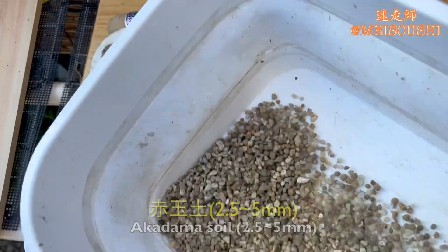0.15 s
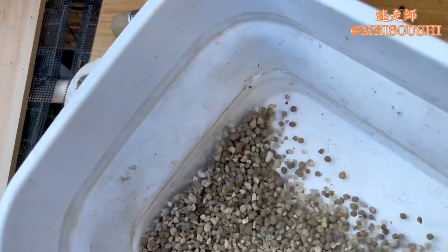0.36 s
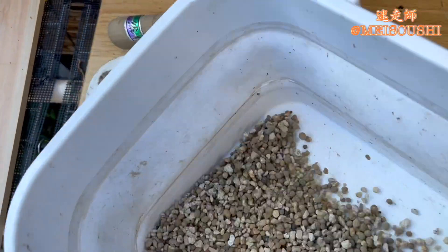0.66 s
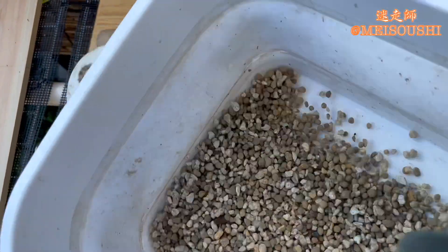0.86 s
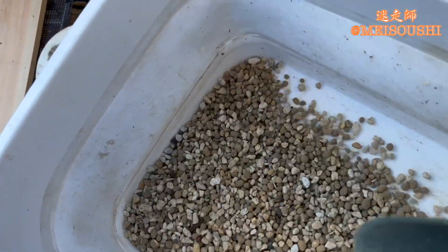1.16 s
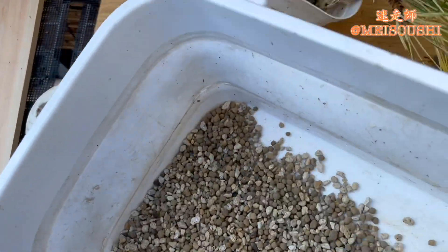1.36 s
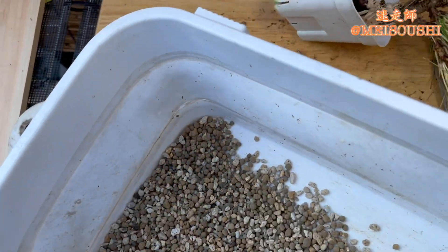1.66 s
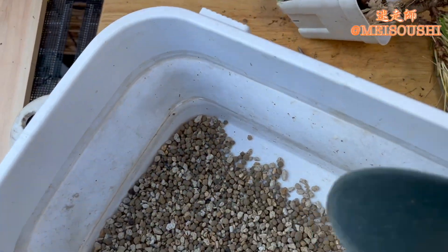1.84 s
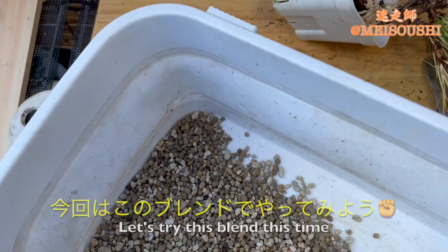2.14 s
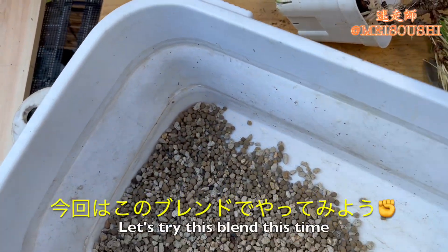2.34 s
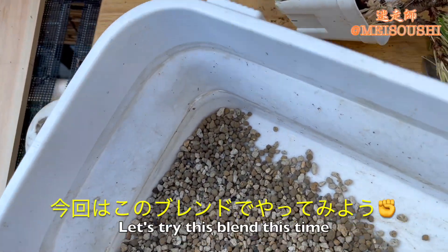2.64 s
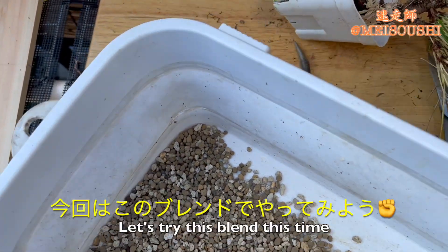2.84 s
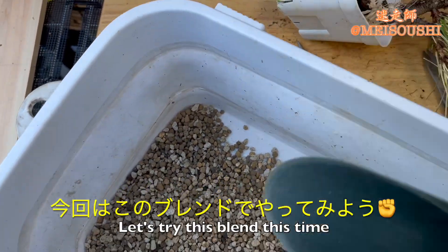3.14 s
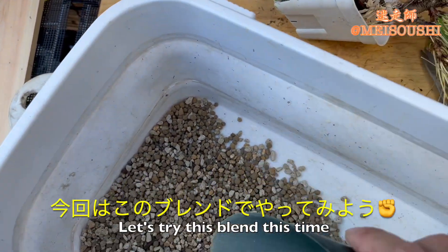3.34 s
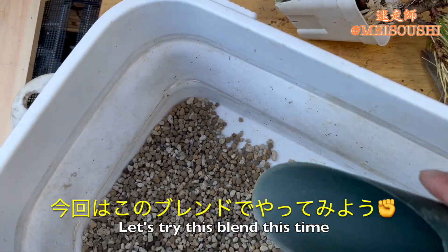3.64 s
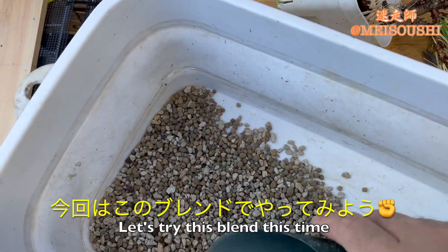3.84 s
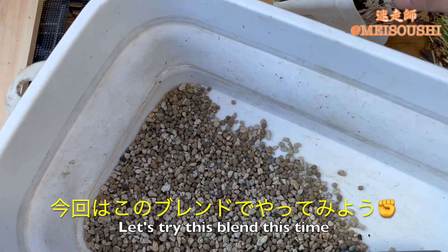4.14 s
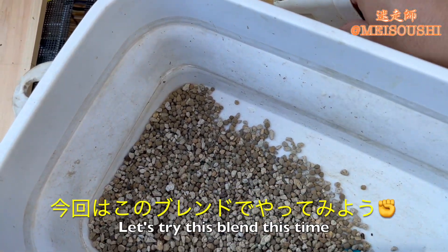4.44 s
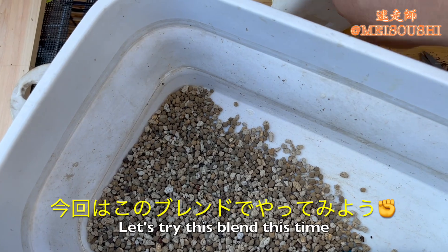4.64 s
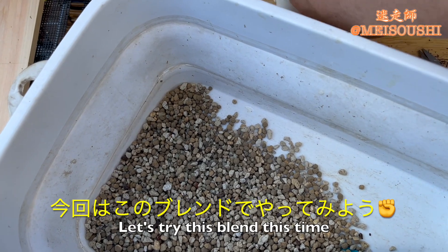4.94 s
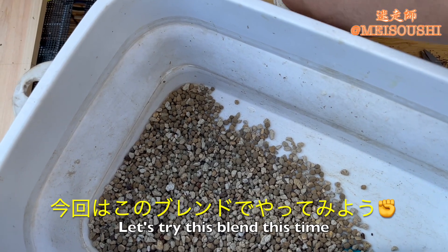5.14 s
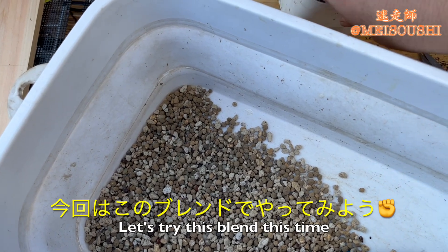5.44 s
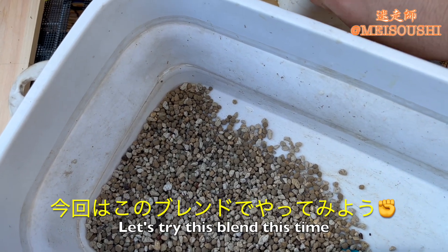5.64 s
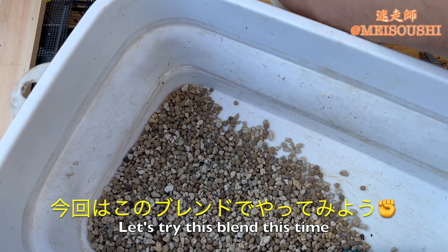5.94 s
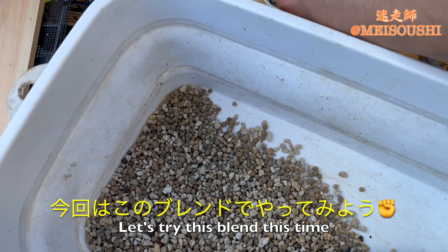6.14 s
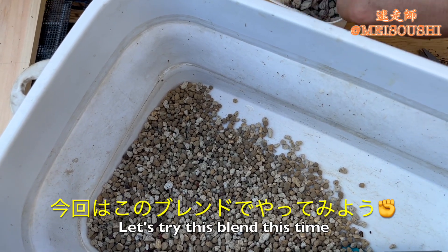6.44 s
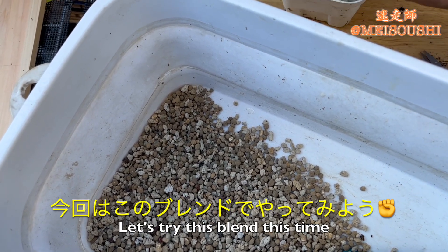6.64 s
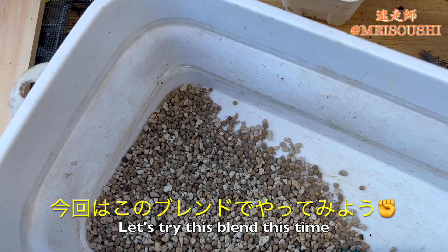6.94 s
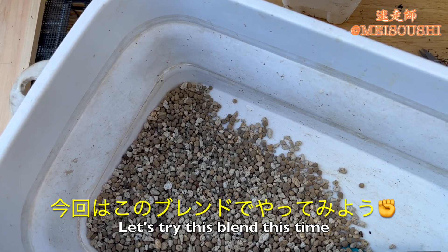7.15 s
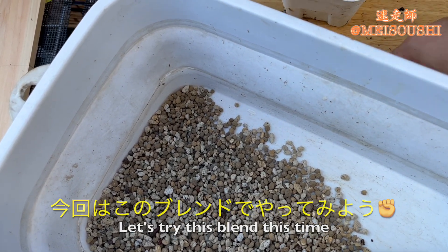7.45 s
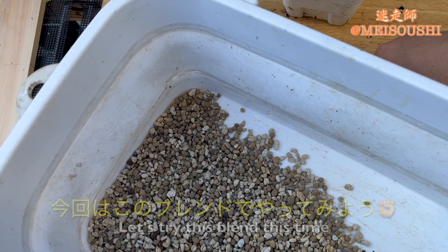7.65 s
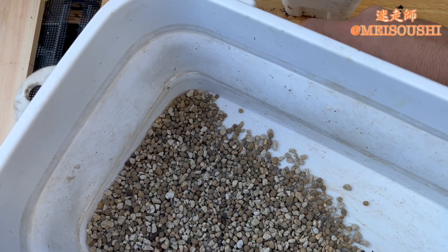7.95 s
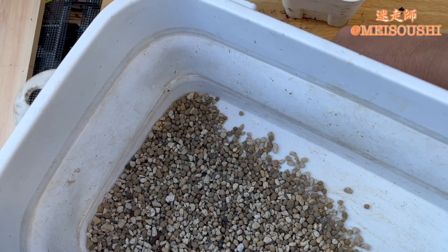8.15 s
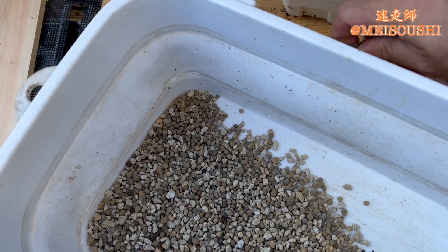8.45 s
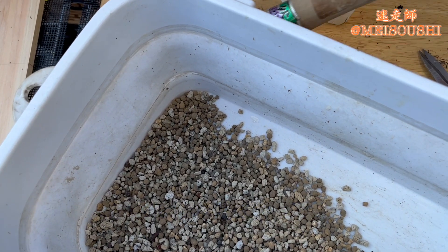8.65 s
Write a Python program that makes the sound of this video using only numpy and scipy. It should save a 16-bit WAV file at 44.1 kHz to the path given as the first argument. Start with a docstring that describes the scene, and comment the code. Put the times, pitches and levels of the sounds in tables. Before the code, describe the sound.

A second of hissing, drumming soil grains into a hollow tub, a few scoop raps, then scattered wooden knocks, scrapes and thin birdsong.

```python
"""Potting bench with birds

Hard soil granules pour from a scoop into a plastic tub as filtered random collisions in waves, and the scoop
is rapped on the tub, ringing its modes. Tools, pots and tub then knock and bump at a wooden bench as dying
vibrations and gritty bursts, with stray ticks, a squeak, sliding and rustling soil. Outdoors, small birds keep up
thin, mostly rising calls, made of gliding sines with echoes, over open air and a low rumble of filtered noise."""
import sys
import numpy as np
from scipy import signal
from scipy.fft import rfft, irfft, next_fast_len
from scipy.io import wavfile
from scipy.ndimage import map_coordinates

SR = 44100
rng = np.random.default_rng(int(sys.argv[2]) if len(sys.argv) > 2 else 0)


def log_audio(samples):
    """Write samples as a 16-bit WAV file to the path given in sys.argv[1]."""
    # one column per channel
    frames = np.atleast_2d(samples).T
    # limit to full scale, then quantise
    limited = np.clip(frames, -1, 1)
    pcm = np.round(limited * 32767).astype(np.int16)
    wavfile.write(sys.argv[1], SR, pcm)


N = 387638

# Hiss of fine granules. Each row: frequency in Hz, relative density in dB per Hz.
GRANULE_HISS = [(1500, 1), (4000, 3), (7500, -0.5), (10000, -3), (12000, -9), (16000, -9)]
# Mid-range clack of plastic. Each row: frequency in Hz, relative density in dB per Hz.
PLASTIC_CLACK = [(300, -24), (700, 6.5), (1300, 19.5), (2000, 10.5), (3600, 3), (5500, -43), (12000, -86)]
# Sharper snap of a small contact. Each row: frequency in Hz, relative density in dB per Hz.
CONTACT_SNAP = [(900, -15.5), (1900, -3.5), (3300, -2.5), (4800, -22.5), (9000, -24.5)]


def amp(db):
    """Decibels to gain."""
    return 10 ** (np.asarray(db) / 20)


def unit(x):
    """Scale to rms 1."""
    return x / np.sqrt(np.mean(x ** 2) + 1e-20)


def crest(x):
    """Scale to peak 1."""
    return x / (np.abs(x).max() + 1e-20)


def along(points, hz):
    """Interpolate (Hz, value) points on a log frequency axis."""
    f, v = np.transpose(points)
    return np.interp(np.log(hz + 1), np.log(f + 1), v)


def curves(rows):
    """One value per sample for each column after the time."""
    s, *cols = np.transpose(rows)
    return [np.interp(np.arange(N) / SR, s, c) for c in cols]


def wobble(rate, size=N):
    """A smooth random curve, rate knots a second."""
    knots = rng.standard_normal(int(size * rate / SR) + 4)
    return map_coordinates(knots, [np.arange(size) * rate / SR])


def coloured(x, gain_db):
    """x through a causal, minimum-phase filter whose dB gain is a function of frequency."""
    size = x.shape[-1]
    m = 2 * next_fast_len(size // 2 + 2048)
    cep = irfft(np.log(amp(gain_db(np.fft.rfftfreq(m, 1 / SR))) + 1e-6))
    # folding the cepstrum forward in time makes the filter causal
    cep[1:m // 2] *= 2
    cep[m // 2 + 1:] = 0
    return irfft(rfft(x, m) * np.exp(rfft(cep)), m)[..., :size]


def shaped(x, spectrum):
    """x filtered by a spectrum of (Hz, dB) points."""
    return coloured(x, lambda hz: along(spectrum, hz))


def spread(pair, side_db):
    """Left and right from a common and a differing signal."""
    return pair[0] + amp(side_db) * np.array([pair[1], -pair[1]])


def panned(x, pan_db):
    """x with its left side raised by pan_db relative to its right."""
    return x * amp([[pan_db / 2], [-pan_db / 2]])


def add(track, s, sound):
    """Mix a sound into a track at time s."""
    start = max(0, round(s * SR))
    part = track[..., start:start + sound.shape[-1]]
    part += sound[..., :part.shape[-1]]


def swells(rows, attack_s, release_s, rest_db):
    """Gain of (s, length, dB) gestures that rise, hold and die away over a resting level."""
    t = np.arange(N) / SR
    power = amp(rest_db) ** 2
    for s, length, db in rows:
        rise = np.clip((t - s) / attack_s, 0, 1)
        fall = np.exp(-np.clip((t - s - length) / release_s, 0, 20))
        power = power + (amp(db) * rise * fall) ** 2
    return np.sqrt(power)


def grains(rate, size_db, side_db):
    """Random collisions, rate a second, of varied size, each from its own direction."""
    hit = rng.random(N) < rate / SR
    size = amp(size_db * np.minimum(rng.exponential(size=N), 4))
    return spread(hit * size * rng.standard_normal((2, N)), side_db)


def burst(t, spectrum, t60):
    """A short gritty crackle; rough surfaces take a moment to meet."""
    decay = amp(-60 * t / max(t60, .001))
    noise = rng.standard_normal((2, len(t))) * decay * (1 - np.exp(-t / 0.00011))
    grit = amp(2.9 * wobble(350, size=SR // 3)[:len(t)])
    return spread(crest(shaped(noise * grit, spectrum)), side_db=4.5)


def mode(t, hz, t60):
    """One vibration that decays by 60 dB in t60 seconds."""
    return np.sin(2 * np.pi * hz * t) * amp(-60 * t / max(t60, .002))


def yard(x):
    """Walls and foliage scatter the sound back, differently to each side."""
    # Decay of the scattered sound. Each row: frequency in Hz, t60 in seconds.
    yard_decay = [(100, 0.16), (1000, 0.042), (4000, 0.13), (12000, 0.072)]
    hz, t, z = signal.stft(rng.standard_normal((2, SR // 2)), SR, nperseg=256)
    decay = amp(-60 * t / along(yard_decay, hz)[:, None])
    tail = signal.istft(z * decay, SR, nperseg=256)[1]
    return signal.fftconvolve(np.atleast_2d(x), tail / np.linalg.norm(tail[0]), axes=1)[:, :N]


def grove(x):
    """Leaves and branches smear a call into a soft tail, different on each side."""
    t60_s = .28
    t = np.arange(SR // 2) / SR
    tail = rng.standard_normal((2, len(t))) * amp(-60 * t / t60_s)
    return signal.fftconvolve(x[None], tail / np.linalg.norm(tail[0]), axes=1)[:, :N]


def echoes(x, count=7):
    """Nearby walls return a few distinct copies, and the trees a diffuse tail."""
    out = np.zeros((2, N))
    for side in out:
        for delay, strength in rng.random((count, 2)):
            add(side, .003 + .04 * delay, (.08 + .16 * strength) * x)
    return out + amp(-2.5) * grove(x)


def pour():
    """Shaken waves of granules and lumps drum on the tub's floor and hiss on each other, then settle."""
    # Waves thrown by shakes of the scoop. Each row: crest in seconds, relative hiss and rattle levels in dB.
    shakes = [(0.0, -27.5, -34), (0.104, -22.5, -27.5), (0.251, -26.5, -31.5), (0.38, -24, -28.5),
              (0.526, -25.5, -29.5), (.59, -44, -36), (0.677, -21.5, -27), (.79, -31, -32), (.94, -33, -38)]
    # Drumming on the tub. Each row: frequency in Hz, relative density in dB per Hz.
    rattle_spectrum = [(60, -49), (150, -17), (300, -2.5), (500, 0.5), (700, -1.5), (1200, 0), (2200, -7),
                       (3500, -12), (5200, -11), (7000, -37), (10000, -45)]
    # The tub's resonances under the stream. Each row: frequency in Hz, width in Hz, boost in dB.
    hollow = [(480, 150, 7), (805, 70, 6.5), (1005, 48, 7), (1296, 29, 5.5), (1827, 81, 5.5),
              (3620, 100, 7)]
    steady_hiss_db, steady_rattle_db = -34, -36.5  # the stream between shakes
    rise_s, fall_s = 0.037, 0.05  # a wave builds quickly and thins out more slowly
    empty_s = .97  # when the scoop runs empty
    rattle_settle, hiss_settle = 120, 230  # dB per second
    t = np.arange(N) / SR
    hiss_power, rattle_power = amp(steady_hiss_db) ** 2, amp(steady_rattle_db) ** 2
    for s, hiss_db, rattle_db in shakes:
        distance = np.maximum((s - t) / rise_s, (t - s) / fall_s)
        wave = np.exp(-np.minimum(distance ** 2, 20))
        hiss_power = hiss_power + amp(hiss_db) ** 2 * wave
        rattle_power = rattle_power + amp(rattle_db) ** 2 * wave

    def tub_db(hz):
        """The drumming spectrum with the tub's resonant peaks on top."""
        peaks = sum(db / (1 + (2 * (hz - c) / w) ** 2) for c, w, db in hollow)
        return along(rattle_spectrum, hz) + peaks

    fine = grains(rate=3400, size_db=-1.7, side_db=-27.0)
    lumps = np.tanh(grains(rate=160, size_db=7.0, side_db=2.5))
    rattle = unit(unit(coloured(fine, tub_db)) + amp(-5) * unit(coloured(lumps, tub_db)))
    hiss = unit(shaped(grains(rate=6000, size_db=0.3, side_db=6.0), GRANULE_HISS))
    settling = np.maximum(t - empty_s, 0)
    rattle_gain = np.sqrt(rattle_power) * amp(-rattle_settle * settling)
    hiss_gain = np.sqrt(hiss_power) * amp(-1.0 - hiss_settle * settling)
    return rattle_gain * rattle + hiss_gain * hiss


def stirred_soil():
    """Granules rub and crunch unevenly with each stroke and with a trickle; a few jump off and tick."""
    # Strokes through loose soil. Each row: start in seconds, length in seconds, relative crunch and hiss in dB.
    stirs = [(1.014, 0.087, -42.5, -60), (1.502, .29, -62, -61.5), (2.037, 0.12, -55, -70),
             (2.753, 0.5, -58, -70), (3.673, 0.14, -48, -61.5), (3.84, 0.2, -47.5, -62),
             (4.47, 0.33, -64.5, -81), (4.733, 0.13, -57, -73), (5.06, .12, -56.5, -72),
             (5.197, 0.26, -63, -91), (6.135, 0.42, -56, -79)]
    # A slow trickle of soil beside the tub. Each row: time in seconds, relative flow in dB.
    trickle = [(5.45, -86), (5.9, -65.5), (6.3, -58.5), (7.05, -58), (7.55, -66), (8.2, -75)]
    # Coarse soil rubbing. Each row: frequency in Hz, relative density in dB per Hz.
    crunch_spectrum = [(200, -17), (500, 6.5), (1350, 11), (2200, 2), (4500, -2.5), (7000, -7.5),
                       (12000, -51)]
    attack_s, release_s = 0.012, 0.084
    crunch_rest_db, hiss_rest_db = -69, -72  # soil creeping between strokes
    trickle_crunch_db, fill_db_per_s = 5, 7  # crunch at first, and how fast the growing heap muffles it
    strokes = np.array(stirs)
    flow_db, = curves(trickle)
    filling_s = np.maximum(np.arange(N) / SR - trickle[0][0], 0)
    trickle_crunch = amp(flow_db + trickle_crunch_db - fill_db_per_s * filling_s)
    stroke_crunch = swells(strokes[:, [0, 1, 2]], attack_s, release_s, crunch_rest_db)
    crunch_gain = np.hypot(stroke_crunch, trickle_crunch)
    stroke_hiss = swells(strokes[:, [0, 1, 3]], attack_s, release_s, hiss_rest_db)
    hiss_gain = np.hypot(stroke_hiss, amp(flow_db))
    crunch = unit(shaped(grains(rate=1100, size_db=2.2, side_db=-3), crunch_spectrum))
    crunch = unit(crunch + yard(crunch[0]))
    hiss = unit(shaped(grains(rate=4000, size_db=2.5, side_db=0), GRANULE_HISS))
    # loose granules that jump off moving soil
    strays = unit(shaped(grains(rate=19, size_db=-7.0, side_db=30.0), GRANULE_HISS))
    unevenness = amp(3.5 * wobble(40) + 2 * wobble(9))
    fine = np.sqrt(unevenness) * hiss + amp(-1.5) * strays
    return crunch_gain * unevenness * crunch + amp(7) * hiss_gain * fine


def shifting():
    """Things dragged over the bench rumble and scrape, over a low distant rumble; both are random noise."""
    # Drags. Each row: start in seconds, length in seconds, relative rumble and scrape levels in dB.
    drag_rows = [(1.358, 0.32, -42, -62), (2.091, 0.082, -33.5, -44), (2.208, 0.12, -28.5, -43),
                 (2.758, 0.37, -36.5, -56), (3.1, 0.19, -45, -52.5), (3.656, 0.45, -49, -53),
                 (6.592, 0.08, -33, -72), (6.763, 0.408, -35.5, -78), (7.56, 0.099, -48.5, -49),
                 (8.051, 0.25, -56, -48), (8.54, 0.19, -42.5, -76)]
    # Low background rumble. Each row: time in seconds, relative level in dB.
    distant = [(0, -47.5), (1.2, -46), (1.9, -47.5), (3.2, -44.5), (4.25, -59.5), (5.0, -49), (5.8, -51.5),
               (6.45, -41), (7.4, -59.5), (8.79, -56.5)]
    # Low rumble. Each row: frequency in Hz, relative density in dB per Hz.
    rumble_spectrum = [(20, -56), (31, 0.5), (45, -4.5), (65, 2), (100, -5), (170, -14.5), (300, -23),
                       (900, -74.5)]
    # Scraping. Each row: frequency in Hz, relative density in dB per Hz.
    scrape_spectrum = [(60, -39), (150, 12.5), (300, 8), (500, 1.5), (750, -22), (1500, -20.5), (4000, -65)]
    attack_s, release_s = 0.021, 0.022
    drags = np.array(drag_rows)
    distant_db, = curves(distant)
    drag_gain = swells(drags[:, [0, 1, 2]], attack_s, release_s, rest_db=-64)
    rumble_gain = np.hypot(drag_gain, amp(distant_db + 2.0))
    scrape_gain = swells(drags[:, [0, 1, 3]], attack_s, release_s, rest_db=-61.5)
    rumble = unit(shaped(spread(rng.standard_normal((2, N)), side_db=-3.5), rumble_spectrum))
    scrape = unit(shaped(grains(rate=650, size_db=2.0, side_db=-0.5), scrape_spectrum))
    return rumble_gain * rumble + amp(3.5) * scrape_gain * panned(scrape, pan_db=-11.0)


def open_air():
    """The steady outdoor background is wide, filtered noise."""
    # Outdoor background. Each row: frequency in Hz, relative density in dB per Hz.
    air_spectrum = [(28, -25), (60, -10), (170, -1.5), (350, -19), (800, -17), (2200, -31.5), (4500, -33),
                    (8000, -34.5), (16000, -51.5)]
    noise = spread(rng.standard_normal((2, N)), side_db=4.5)
    return amp(-51.0) * unit(shaped(noise, air_spectrum))


def whistle(length, start_hz, end_hz, bow):
    """A raspy whistle bends between two pitches over a low second voice, then glides fast to a last pitch."""
    close_hz, close_s = 2972, .028  # where the closing glide aims, and its duration
    under_hz, under_follows = 2710, 0.19  # second voice: resting pitch, share by which it follows the first
    length = np.clip(length, .02, .2)
    t = np.arange(int((length + close_s) * SR)) / SR
    u, after = np.minimum(t / length, 1), np.maximum(t - length, 0)
    waver, rasp, flutter = [wobble(rate, size=SR // 4)[:len(t)] for rate in (600, 700, 80)]
    middle_hz = (start_hz + end_hz) / 2 * (1 + bow)
    arch = np.polyval(np.polyfit([0, .5, 1], [start_hz, middle_hz, end_hz], 2), u)
    hz = arch * (close_hz / end_hz) ** (after / close_s) * (1 + .013 * waver)
    second_hz = under_hz * (hz / under_hz) ** under_follows
    phase, under = 2 * np.pi * np.cumsum([hz, second_hz], axis=1) / SR
    # low calls are richer in their octave
    octave = amp(np.interp(middle_hz, [3650, 4250], [-11, -22])) * np.sin(2 * phase)
    voice = np.sin(phase) + octave + amp(-14.5) * np.sin(under)
    swell = np.interp(t / length, [0, .1, .6, 1, t[-1] / length], [0, .6, 1.1, .45, .1])
    rough = unit(voice * amp(3 * rasp + 3.5 * flutter))
    return swell * signal.windows.tukey(len(t), .1) * rough


def flock(count=800):
    """Faint overlapping notes from further off come in bouts and blur into a chatter."""
    # Bouts of twitter. Each row: start in seconds, length in seconds, level in dB.
    bouts = [(1.28, .8, -58), (5.05, 0.2, -56.5), (5.55, 0.25, -60), (6.08, 0.41, -56.5), (6.5, 0.34, -58),
             (7.35, 1.16, -55.5)]
    notes = []
    for pitch, slope in rng.random((90, 2)):
        start_hz = 2900 + 2400 * pitch
        notes.append(whistle(.05, start_hz, start_hz * (.88 + .3 * slope), bow=.02))
    out = np.zeros(N)
    for when, which in rng.random((count, 2)):
        add(out, when * N / SR, notes[int(which * len(notes))])
    gain = swells(bouts, attack_s=0.0077, release_s=0.047, rest_db=-68)
    return gain * unit(grove(out) + out / 2)


def raps():
    """Each rap of the scoop rings the tub; a harder contact wakes its higher modes."""
    # Modes of the plastic floor. Each row: frequency in Hz, relative level in dB, t60 in seconds at full ring.
    tub_modes = [(172.5, -14.5, 0.28), (281, 4, 0.033), (341, 0.5, 0.052), (489.9, -1.5, 0.16),
                 (497, -1.5, 0.14), (741, -4, 0.06), (842, -6.5, 0.074), (1302, -17, 0.16),
                 (1570, -14.5, 0.071), (2650, -19, 0.033), (3720, -16.5, 0.033)]
    # Raps. Each row: time in seconds, relative level in dB, hardness in dB per octave, share of the full ring.
    rap_rows = [(.337, -17.5, -0.5, 0.24), (.596, -19, 1, 0.29), (0.72, -20, -9, 0.3),
                (.764, -9, -3.5, 0.98), (0.982, -7.5, 1, 1.07), (1.064, -10.5, -2.5, 0.75),
                (1.111, -18.5, -3, 1.3), (1.117, -25.5, 2.5, 1.2), (1.194, -31, 1.5, 0.35)]
    out, t = np.zeros((2, N)), np.arange(SR // 3) / SR
    for s, db, hardness_db, length in rap_rows:
        ring = 0
        for hz, level, t60 in tub_modes:
            tilt_db = hardness_db * np.log2(hz / 500)
            gain = amp(level + tilt_db + rng.normal(0, 1, (2, 1)))  # each side differs a little
            ring = ring + gain * mode(t, hz, t60 * length)
        ring = crest(ring * (1 - np.exp(-t / 0.002)))
        clack = amp(-9.0 + 2 * hardness_db) * burst(t, PLASTIC_CLACK, t60=0.05)
        add(out, s, amp(db - 2.5) * (panned(ring, pan_db=-6.5) + clack))
    return out


def bumps():
    """Soft contacts push the bench through a few quickly damped swings."""
    # Bumps. Each row: time in seconds, peak in dB, frequency in Hz.
    bump_rows = [(0.728, -27.5, 88), (1.478, -28, 110), (1.638, -27.5, 77), (2.24, -30, 97.5),
                 (2.345, -20, 74.5), (3.974, -23.5, 118), (5.075, -35.5, 190), (6.624, -23, 54.7),
                 (6.642, -20, 114), (6.998, -20, 68.5), (7.018, -16, 58), (7.12, -26.5, 92),
                 (8.203, -31.5, 232)]
    out, t = np.zeros(N), np.arange(SR // 4) / SR
    for s, db, hz in bump_rows:
        swing = mode(t, hz, t60=0.036) * (1 - np.exp(-t / 0.0069))
        add(out, s, amp(db) * crest(swing))
    return out


def birds_and_squeak():
    """Nearer birds whistle gliding calls and the plastic scoop squeaks once, heard directly and in echoes."""
    # Bird calls, and at 8.103 s one short rising squeak of the plastic scoop.
    # Each row: start in seconds, length in seconds before the closing glide, start pitch in Hz,
    # end pitch in Hz, share by which the middle bends up, relative level in dB.
    gliding_rows = [(1.159, 0.13, 3815, 4105, 0.19, -50), (1.297, 0.065, 3250, 3790, 0.05, -55.5),
                    (1.37, 0.044, 4450, 5280, 0.051, -56), (1.394, 0.1, 3750, 5270, 0.05, -52),
                    (1.598, 0.1, 5220, 6730, .02, -51), (1.757, .06, 4540, 5210, 0.071, -53),
                    (1.888, 0.045, 3900, 3800, .02, -48), (1.921, 0.084, 3750, 6000, 0.088, -46),
                    (2.644, .093, 3720, 3890, 0.078, -51), (3.21, .083, 3120, 3405, 0.12, -46),
                    (3.227, 0.093, 5070, 4290, .14, -49.5), (3.441, 0.12, 3130, 6240, 0.051, -45.5),
                    (3.611, 0.088, 3180, 3480, 0.022, -56), (3.613, .07, 4800, 5250, .02, -56),
                    (4.145, 0.075, 3527, 4120, 0.021, -45.5), (4.228, 0.056, 4000, 4340, 0.044, -46),
                    (4.152, 0.15, 3230, 3010, 0.19, -51.5), (4.36, .13, 4320, 7550, -0.072, -55),
                    (4.674, 0.061, 3100, 5770, 0.15, -55.5), (5.03, 0.12, 2660, 4370, 0.21, -55.5),
                    (5.166, 0.097, 4960, 4670, 0.013, -61.5), (5.321, 0.066, 3900, 4430, 0.04, -59),
                    (5.543, 0.05, 3560, 7000, 0.044, -56), (5.585, 0.13, 6900, 7460, 0.014, -64),
                    (5.544, 0.14, 3250, 3490, 0.073, -61), (5.675, 0.088, 4100, 4950, 0.044, -58.5),
                    (5.845, 0.086, 4910, 7700, -0.073, -56), (5.935, .075, 3160, 4100, .08, -58.5),
                    (6.052, .095, 2890, 4570, 0.17, -57), (6.194, 0.11, 3960, 4620, 0.025, -56),
                    (6.519, 0.11, 3700, 4460, 0.064, -57), (6.742, .07, 4800, 5160, 0.056, -55.5),
                    (6.744, 0.091, 3195, 3570, 0.063, -51), (6.997, .17, 3200, 5130, 0.028, -51),
                    (7.269, 0.13, 3550, 4900, 0.042, -57.5), (7.346, 0.14, 3180, 5680, 0.16, -49),
                    (7.55, .065, 4000, 4700, .02, -55), (7.715, 0.13, 4430, 6350, 0.096, -53.5),
                    (7.689, 0.13, 4070, 3970, 0.098, -57.5), (7.849, 0.088, 3850, 3560, .01, -56.5),
                    (7.715, 0.081, 2430, 2110, -.04, -63), (8.011, 0.056, 3210, 4330, -0.053, -57),
                    (8.055, 0.058, 4580, 5760, 0.045, -50), (8.103, 0.016, 1834, 3100, -0.042, -49),
                    (8.157, 0.044, 3050, 3400, 0.044, -57), (8.276, 0.077, 4380, 4670, .02, -59),
                    (8.367, 0.13, 3160, 6290, 0.12, -53.5), (8.46, 0.051, 2990, 2890, -0.04, -60),
                    (8.502, .12, 4900, 4920, -0.019, -55), (8.663, 0.025, 3010, 3490, -0.058, -50),
                    (8.686, .085, 3770, 5320, 0.17, -51)]
    out = np.zeros(N)
    for s, length, start_hz, end_hz, bow, db in gliding_rows:
        add(out, s, amp(db) * whistle(length, start_hz, end_hz, bow))
    return amp(-1) * panned(out, pan_db=1.5) + echoes(out)


def knocks():
    """A knock is a crack, a clack, a woody rattle and a ring; its thud sinks as the low mode arrives."""
    # Knocks on bench, pots and tub. Each row: time in seconds, relative level in dB, main frequency in Hz,
    # wood in dB, hardness in dB, main t60 in seconds, low mode in Hz, its level in dB,
    # ring of the thing struck in Hz, its level in dB. The part levels are relative.
    knock_rows = [(1.369, -37.5, 462, -17, -9.5, 0.035, 252, -11, 1017, -7.5),
                  (1.453, -36.5, 272, -32, -17, 0.069, 139, -7, 1000, -29),
                  (2.057, -32.5, 499, -1.5, -14.5, 0.046, 197, -0.5, 925, -7.5),
                  (2.143, -27.5, 302, -16, -20, 0.091, 150, -17, 1450, -19),
                  (2.777, -23, 364, -8.5, -15.5, 0.046, 268, -3, 1450, -31),
                  (2.82, -27, 420, 2, -5, 0.03, 210, 3.5, 1310, 3),
                  (2.832, -20, 495, -9, -13, 0.024, 298, -3, 1250, -6),
                  (2.906, -27, 483, -0.5, -9.5, 0.079, 280, 2.5, 880, 2),
                  (2.952, -25, 327, -4.5, -12.5, .03, 210, -2, 905, -7.5),
                  (2.972, -27.5, 328, -7, -14.5, 0.033, 191, -7, 897, -7),
                  (2.99, -22.5, 285, -14, -19.5, 0.044, 168, -20, 890, -21),
                  (3.191, -29.5, 326, -3.5, -27, 0.061, 163, -14, 1130, -13),
                  (3.894, -21.5, 485, -21, -7.5, 0.032, 320, -9.5, 2720, -5.5),
                  (3.968, -12, 615, -16, -9.5, 0.024, 295, -8, 2253, -9.5),
                  (4.046, -30.5, 332, -15, -23, 0.022, 195, -3, 1100, -25),
                  (4.09, -25.5, 317, -33, -22, 0.013, 280, -14, 1120, -28),
                  (5.005, -34.5, 494, -2.5, -8.5, 0.052, 269, -4, 863, -6.5),
                  (5.11, -37, 494, -13, -8.5, 0.065, 250, -14, 1310, -13),
                  (5.804, -40.5, 495, -5, -18, 0.093, 209, 0.5, 864, -12),
                  (6.037, -43.5, 498, -3, -24, 0.092, 252, -6, 800, -9),
                  (6.526, -42, 487, 3, -2, 0.065, 250, -21, 1450, -2),
                  (7.547, -29.5, 442, -9, -21, 0.029, 228, -7, 1030, -19),
                  (7.621, -36.5, 352, -12, -17, 0.093, 212, 7.5, 900, -22),
                  (8.226, -25, 410, -1.5, -35, 0.036, 233, -13, 1420, -21),
                  (8.271, -18.5, 452, -14.5, -24.5, 0.045, 223, -2.5, 1123, -15),
                  (8.561, -13.5, 520, -16, -10, 0.032, 303, -2.5, 1260, -12),
                  (8.679, -25, 423, -26, -34, 0.035, 218, -9, 1120, -20.5)]
    # Close modes of a knock. Each row: multiple of the main frequency, relative level in dB, share of the t60.
    knock_modes = [(.74, -8, 1.1), (1, 0, .85), (1.14, -6, .7), (1.36, -13, .55), (1.8, -20, .45)]
    # Treble crack. Each row: frequency in Hz, relative density in dB per Hz.
    crack_spectrum = [(1500, 8), (4000, -6.5), (7500, -4.5), (10000, -12), (12000, -17), (16000, -26)]
    wood_spectrum = [(400, -43), (700, 7.0), (1400, 7.0), (2100, -21), (5000, -33)]  # (Hz, dB per Hz)
    low_lag_s, low_rise_s, low_t60_s = 0.0034, 0.0013, 0.048  # slow bending waves bring the low mode in late
    ring_t60_s = 0.059  # at 1000 Hz; higher rings die sooner
    out, t = np.zeros((2, N)), np.arange(SR // 4) / SR
    late = np.maximum(t - low_lag_s, 0)
    for s, db, hz, wood_db, hardness_db, t60, low_hz, low_db, ring_hz, ring_db in knock_rows:
        body = 0
        for ratio, level, share in knock_modes:
            gain = amp(level + rng.normal(0, 1))
            body = body + gain * mode(t, hz * ratio * rng.normal(1, .03), t60 * share)
        body = crest(body * (1 - np.exp(-t / 0.0053)))
        low = crest(mode(late, low_hz, low_t60_s) * (1 - np.exp(-late / low_rise_s)))
        thud = panned(body + amp(low_db) * low, pan_db=-8.5)
        wood = amp(wood_db - 1.5) * burst(t, wood_spectrum, t60=0.083)
        ring = mode(t, ring_hz, ring_t60_s * np.sqrt(1000 / ring_hz)) * (1 - np.exp(-t / 0.00081))
        ring = amp(ring_db + 2.0) * ring
        clack = amp(hardness_db + 7.0) * burst(t, CONTACT_SNAP, t60=0.013)
        crack = amp(hardness_db + 6.0) * burst(t, crack_spectrum, t60=0.031)
        contact = panned(clack + crack, pan_db=2.0)
        add(out, s, amp(db) * (thud + panned(wood + ring, pan_db=0.0) + contact))
    return out


def ticks():
    """Granules and sharp contacts tick and snap, with brief pings at pitches scattered from spot to spot."""
    # Granule ticks on plastic, sharp contacts that go with the knocks near 3.9 s, and near 8.11 s the noisy
    # burst of the scoop's squeak. # Each row: time in seconds, relative level in dB, relative body in dB.
    tick_rows = [(1.5645, -36, 4.5), (1.682, -30.5, -4), (1.709, -30.5, -3), (1.7342, -35, -8),
                 (1.747, -33.5, -5.5), (1.7942, -39.5, 2.5), (2.117, -44, 0.5), (2.798, -36, -4),
                 (3.1298, -39, -13), (3.1785, -40, -1), (3.212, -27.5, -8), (3.9013, -14.5, -20),
                 (3.9647, -12.5, -14), (4.0391, -25, -11.5), (4.084, -30.5, -20), (4.104, -36, -9),
                 (4.1246, -32, -14), (4.603, -44, -10), (4.709, -34.5, -30), (4.856, -48, -6),
                 (4.918, -30, -26), (6.146, -48, -5), (6.233, -34.5, -20), (6.3015, -50, 6),
                 (6.329, -45, 5), (6.401, -46, 1), (7.3748, -32, -34), (8.1105, -26.5, -15),
                 (8.117, -35, -10)]
    # Bright tick. Each row: frequency in Hz, relative density in dB per Hz.
    tick_spectrum = [(1500, -26), (4000, 6.5), (7500, -0.5), (10000, -1.5), (12000, -4), (16000, -9.5)]
    ping_hz, ping_t60_s = 2930, 0.033  # median pitch, decay
    out, t = np.zeros((2, N)), np.arange(SR // 5) / SR
    for s, db, body_db in tick_rows:
        spots = rng.standard_normal(5)
        ping = crest(sum(mode(t, ping_hz * np.exp(0.247 * spot), ping_t60_s) for spot in spots))
        clack = amp(-9.0) * burst(t, PLASTIC_CLACK, t60=0.11)
        snap = amp(2.5) * burst(t, CONTACT_SNAP, t60=0.027)
        body = clack + snap + amp(-1.5) * ping
        add(out, s, amp(db - 4.0) * (burst(t, tick_spectrum, t60=0.03) + amp(body_db + 5.0) * body))
    return out


def slides():
    """The scoop slides over plastic and soil; its edge catches and slips, sounding its hollow."""
    # Slides. Each row: start in seconds, length in seconds, level in dB,
    # frequency in Hz of the scoop's hollow, which shifts with the grip.
    slide_rows = [(2.115, .06, -42.5, 470), (2.235, 0.075, -47, 428), (2.835, 0.027, -49, 520),
                  (2.94, 0.09, -40.5, 476), (3.193, .13, -47.5, 457), (3.672, .12, -38.5, 448),
                  (3.76, 0.115, -45.5, 457), (7.498, 0.052, -50, 463), (8.155, 0.085, -42.5, 330)]
    # The scoop's colour, stretched to each hollow. Each row: frequency in Hz, relative density in dB per Hz.
    scoop_spectrum = [(150, -19), (320, 1), (450, 14), (560, 1.5), (750, -7), (1050, -9.5), (1500, -21),
                      (2100, -16.5), (5000, -34), (12000, -64)]
    out, contacts = np.zeros((2, N)), grains(rate=1400, size_db=-1.0, side_db=-9.0)
    for s, length, db, hollow_hz in slide_rows:
        window = signal.windows.tukey(int(max(length, .02) * SR), .5)
        stretch = scoop_spectrum[2][0] / hollow_hz
        rough = contacts[:, int(s * SR):][:, :len(window)]
        rub = coloured(rough, lambda hz: along(scoop_spectrum, hz * stretch))
        add(out, s, amp(db) * window * unit(rub))
    return out


def pot_clink():
    """A pot clinks once further off: its modes ring under a gritty clack."""
    # Modes of the pot. Each row: frequency in Hz, relative level in dB, t60 in seconds.
    pot_modes = [(920, -3, 0.24), (1052, -4, 0.32), (1515, 5, 0.1), (1970, 4, 0.07), (2410, -16, .1)]
    out, t = np.zeros((2, N)), np.arange(SR // 5) / SR
    clink = sum(amp(level) * mode(t, hz, t60) for hz, level, t60 in pot_modes)
    clink = crest(clink * (1 - np.exp(-t / 0.004)))
    add(out, 6.795, amp(-33.0) * (clink + amp(-1.5) * burst(t, PLASTIC_CLACK, t60=0.35)))
    return out


def scene():
    """The work at the bench, the birds and the open air."""
    near = pour() + raps() + knocks() + ticks() + pot_clink()
    work = near + amp(-12.0) * yard(near) + stirred_soil() + slides() + shifting() + bumps()
    return work + birds_and_squeak() + flock() + open_air()


def record(dry):
    """Fixed treble notches colour the sides' sum and difference, the sharpest peaks saturate, the top is cut."""
    # Colour of sound common to both sides. Each row: frequency in Hz, gain in dB.
    mid_colour = [(22, -12), (48, 0), (5200, 2.5), (6150, -1), (6600, -5), (7100, 4.5), (10800, 4),
                  (11700, -0.5), (12800, -55), (13800, 0), (14800, 1)]
    # Colour of the difference between the sides. Each row: frequency in Hz, gain in dB.
    side_colour = [(100, -10), (300, -8), (600, -1), (3000, -9), (6200, -6.5), (7600, -1), (9200, -64),
                   (10800, -2), (12500, 1.5), (15000, -5)]
    top_hz = 16100
    mid = shaped((dry[0] + dry[1]) / 2, mid_colour)
    side = shaped((dry[0] - dry[1]) / 2, side_colour)
    pair = np.array([mid + side, mid - side])
    pair = pair / (1 + (pair / .5) ** 6) ** (1 / 6)  # saturates towards 0.5
    m = next_fast_len(N + SR // 2)
    kept = np.fft.rfftfreq(m, 1 / SR) < top_hz
    return irfft(rfft(pair, m) * kept, m)[:, :N]


dry = scene()
out = record(dry)
log_audio(out)
```